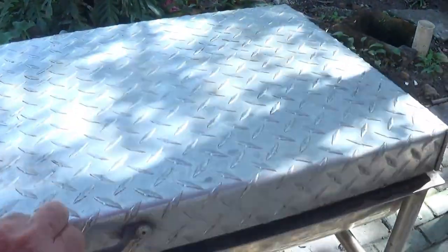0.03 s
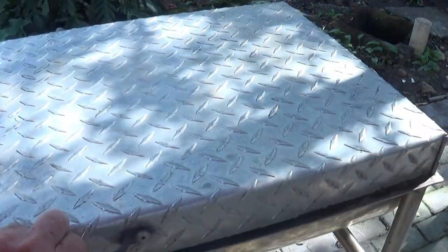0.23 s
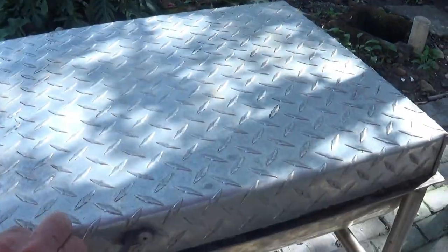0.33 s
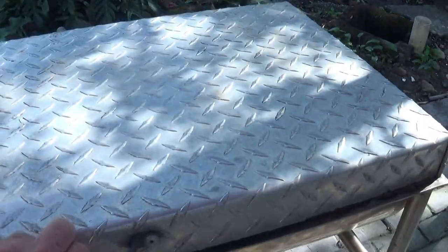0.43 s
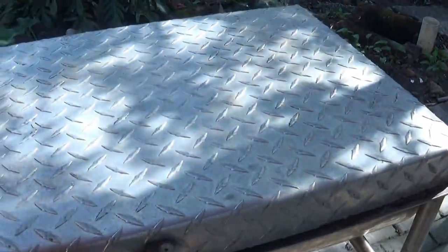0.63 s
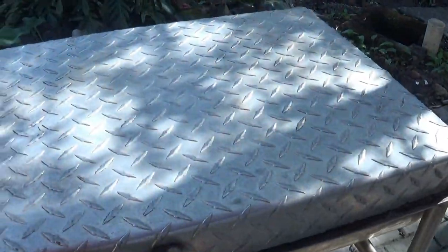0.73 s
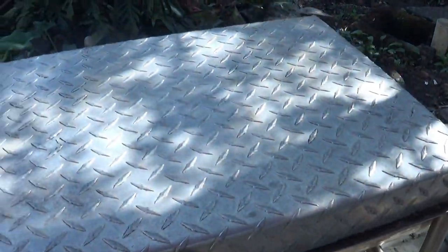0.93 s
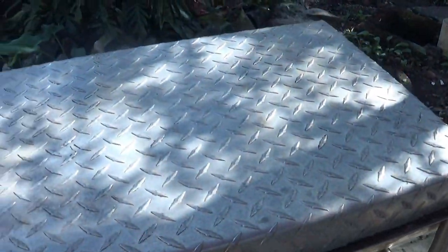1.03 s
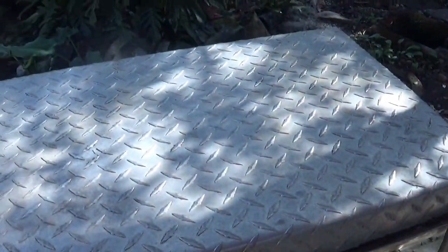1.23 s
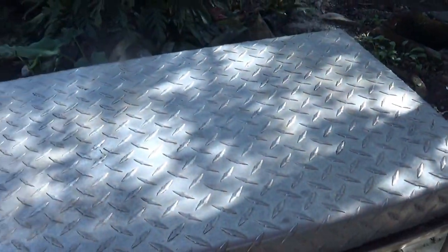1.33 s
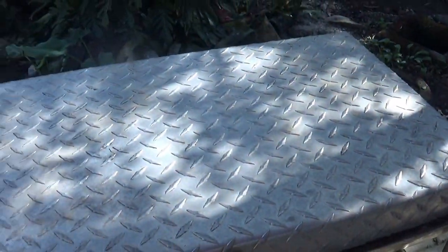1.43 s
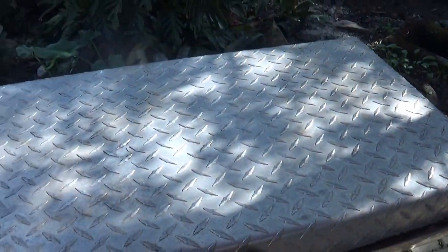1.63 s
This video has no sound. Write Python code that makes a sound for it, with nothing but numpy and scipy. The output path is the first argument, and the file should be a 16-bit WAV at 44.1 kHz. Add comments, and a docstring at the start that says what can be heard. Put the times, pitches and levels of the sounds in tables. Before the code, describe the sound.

A heavy steel lid slams shut on a smoker at about 0.2 seconds, close and loud, chattering against the rim with a hollow boom. Its metallic ring fades by about one second. A thin, sharp tick comes at 0.6 seconds, then a few faint scuffs and a soft knock near 1.7. Quiet garden air and a slight rustle lie beneath, with a very faint bird from 1.2 seconds.

```python
"""Smoker lid slamming shut

A heavy tread-plate lid drops on an outdoor smoker: one edge lands, then the whole rim slams down and
chatters. Each contact clashes steel on steel and feeds the ringing plate; the chamber booms below.
A sharp tick, faint scuffs, a soft knock and a distant bird sit over a thin rustle and quiet garden air.
A limiter ducks the slam."""
import sys
import numpy as np
from scipy import signal
from scipy.fft import irfft
from scipy.io import wavfile
from scipy.ndimage import uniform_filter1d

SR = 44100
rng = np.random.default_rng(int(sys.argv[2]) if len(sys.argv) > 2 else 0)


def unload_wav(signal):
    """Save mono or channel-first audio to the path in sys.argv[1] as 16-bit WAV at rate SR, clipped to [-1, 1]."""
    wavfile.write(
        sys.argv[1],
        SR,
        np.round(np.clip(np.atleast_2d(signal).T, -1, 1) * 32767).astype(np.int16),
    )


N = 74970
TIME = np.arange(N) / SR
FREQS = np.maximum(np.fft.rfftfreq(N, 1 / SR), 1)

# the lid meets the rim: t/s, plate ring level/dB, edge clash level/dB
RIM_CONTACTS = [(0.163, -21.5, -27.5), (0.1854, -19, -5), (0.196, -21, -18.5), (0.214, -22.5, -16.5),
                (0.2205, -40, -20), (0.241, -37, -31.5), (0.257, -41, -22), (0.267, -42, -21.5),
                (0.2685, -28, -37), (0.276, -38.5, -31), (0.296, -59, -40.5)]
# the lid's clear notes: f/Hz, relative level/dB, t60/s before the SUSTAIN stretch
LID_NOTES = [(170, -20, .4), (188, -26, .9), (197, -21, .45), (235, -21, .75), (253, -23, .8),
             (261, -17, .42), (298, -16, .36), (319, -14, .4), (394, -26, .7), (434, -29, 1.0),
             (456, -16, .4), (524, -27, .9), (547, -20, .42), (592, -29, .95), (619, -18, .4),
             (743, -19, .42), (764, -26, 1.0), (823, -16, .4), (836, -12, .46), (875, -25, .8),
             (893, -24, .7), (957, -31, .75), (1081, -21, .36), (1124, -21, .4), (1318, -25, .62),
             (1427, -19.5, .7), (1558, -25, .8), (1735, -27, .9), (1841, -26, 1.0), (1901, -18, .28),
             (1940, -15, .3), (2075, -14, .26), (2142, -14, .3), (2287, -17, .35), (2635, -12, .26),
             (2770, -16, .26), (3021, -23, .43), (3068, -21, .28), (4161, -26, .44), (4417, -20, .22),
             (4651, -21, .26), (5120, -26, .28), (6535, -20, .17), (7315, -19, .17), (7509, -17, .17),
             (9255, -13, .08), (9487, -14, .09)]
# tone of the wash of weaker plate modes: f/Hz, relative density/dB
WASH_SPECTRUM = [(40, -7), (100, -17.5), (170, -12.5), (260, -8.5), (400, -6), (600, -7), (850, -4.5),
                 (1200, -5.5), (1550, -9), (2200, 0.5), (3000, -2.5), (4200, -11.5), (7500, -15),
                 (10500, -22.5), (14500, -59)]
# decay of that wash: f/Hz, t60/s
WASH_DECAY = [(60, 1), (220, 0.66), (800, 0.66), (1500, 0.56), (2300, 0.33), (4500, 0.35), (7500, 0.27),
              (14000, .17)]
# tone of steel on steel at the rim: f/Hz, relative density/dB
CLASH_SPECTRUM = [(60, -30), (250, -9), (1000, -46), (2500, -8), (5000, -12), (7400, -4), (8500, -8),
                  (9400, 3), (10800, -7), (12000, -11), (13200, -25), (14800, -42)]
# stereo image of wash, clash and scuffs: f/Hz, left-right correlation
LID_IMAGE = [(60, 0.46), (160, 1), (300, 0.54), (1000, 0.85), (4500, 0.71), (9000, 0.87), (14000, 0.92)]
# heavy contacts that shake the cooking chamber: t/s, level/dB
BOOM_HITS = [(0.164, -21), (0.221, -20.5)]
# the chamber's resonances: f/Hz, relative level/dB, t60/s
BOOM_MODES = [(188, -9, 0.17), (261.4, 1, 0.13), (292, -14, 0.085)]
# a small hard contact, then its faint echo: t/s, level/dB
TICK_HITS = [(0.6131, -24.5), (0.6195, -36)]
# their bright ring: f/Hz, relative level/dB, t60/s
TICK_RING = [(5300, -23, 0.0072), (5700, -8.5, .005), (6550, 1, 0.0046), (6980, -6.5, 0.01)]
# gritty scuffs: t/s, level/dB, rise/s, t60/s
SCUFF_STROKES = [(0.0415, -44, 0.0018, 0.11), (0.704, -47, 0.003, 0.049), (1.194, -51, 0.0018, 0.039),
                 (1.570, -43, 0.0018, 0.033), (1.608, -54.5, 0.0037, 0.11)]
# tone of the grit: f/Hz, relative density/dB
SCUFF_SPECTRUM = [(300, -47), (1200, -6.5), (3500, -2.5), (6000, -3), (9000, 4), (11000, -2), (14500, -30)]
# body of the soft knock: f/Hz, relative level/dB, t60/s
KNOCK_MODES = [(547, -17, 0.035), (870, 4, 0.011), (1530, 4, 0.0064)]
# the bird's slurred notes: t/s, length/s, start f/Hz, end f/Hz, level/dB
BIRD_SLURS = [(1.205, 0.091, 2870, 2400, -71), (1.429, 0.102, 2950, 2860, -70),
              (1.6, .035, 6600, 5700, -65)]
# swells of the rustle: t/s, level/dB
RUSTLE_FADER = [(0, -62.5), (0.14, -65), (0.4, -69), (0.465, -62), (0.51, -72), (0.585, -52.5),
                (0.62, -56.5), (0.74, -65), (0.86, -64.5), (1.3, -71.5), (1.7, -69.5)]
# tone of the rustle: f/Hz, relative density/dB
RUSTLE_SPECTRUM = [(4000, -24), (7500, -7), (9000, -6), (9900, -1.5), (11000, -5), (12500, -17),
                   (15000, -26)]
# drift of the garden air: t/s, level/dB
AIR_FADER = [(0, -55), (0.15, -58), (0.5, -56), (1.0, -58.5), (1.7, -59)]
# tone of the air: f/Hz, relative density/dB
AIR_SPECTRUM = [(15, -66), (25, -40), (59, -17), (92, -18.5), (236, -3.5), (416, -4), (451, -2), (575, -1),
                (936, -4.5), (1190, -5.5), (2050, -10), (2280, -8), (3820, -14.5), (10400, -16),
                (16000, -24)]
# stereo image of air and rustle: f/Hz, left-right correlation
AIR_IMAGE = [(60, 1), (290, 0.96), (640, 0.78), (1410, 0.46), (3100, 0.47), (6820, 0.85), (15000, 1)]

SUSTAIN = 1.43   # stretches the decay of every lid note
LID_LOW_CUT_HZ, TICK_LOW_CUT_HZ = 173, 2400   # small bodies radiate little bass
TOP_HZ = 16000


def from_db(db):
    """Decibels to gain."""
    return 10 ** (np.asarray(db) / 20)


def flutter(samples):
    """Smoothed random wobble at unit rms."""
    wobble = uniform_filter1d(rng.standard_normal(N), size=samples)
    return wobble / np.sqrt(np.mean(wobble ** 2) + 1e-20)


def at_hz(points, hz):
    """Read a table on a log-frequency axis."""
    table_hz, values = np.transpose(points)
    return np.interp(np.log(hz), np.log(table_hz), values)


def low_cut(x, hz):
    """Second-order high-pass."""
    return signal.sosfilt(signal.butter(2, hz, "high", fs=SR, output="sos"), x)


def stereo_lines(spectrum, image, weight=1):
    """Stereo spectrum of lines with random phases, for a sound of unit rms."""
    mid, side = np.exp(2j * np.pi * rng.random((2, len(FREQS))))
    alike = np.clip(at_hz(image, FREQS), -1, 1)
    lines = np.sqrt(1 + alike) * mid + np.sqrt(1 - alike) * side * [[1], [-1]]
    lines *= from_db(at_hz(spectrum, FREQS)) * weight
    return lines / irfft(lines, N).std()


def clicks(hits):
    """One impulse per row of t/s, level/dB."""
    out = np.zeros(N)
    for s, db in hits:
        out[int(s * SR)] += from_db(db)
    return out


def ring_out(blows, t60, spread_s=0.0019):
    """Envelope of a struck body: each blow adds energy, which spreads and dies away."""
    keep, fill = from_db(-120 / (t60 * SR)), np.exp(-1 / (spread_s * SR))
    energy = signal.lfilter([1 - fill], np.convolve([1, -keep], [1, -fill]), blows ** 2 + 1e-22)
    return np.sqrt(energy)


def struck(hits, modes):
    """Clicks set damped sines ringing."""
    out, drive = 0, clicks(hits) + 1e-18
    for hz, db, t60 in modes:
        r, w = from_db(-60 / (t60 * SR)), 2 * np.pi * hz / SR
        out = out + from_db(db) * signal.lfilter([0, np.sin(w)], [1, -2 * r * np.cos(w), r * r], drive)
    return out


def lid(seat_s=0.296, settle_s=0.053, seat_loss_db=3.5):
    """The slam: contacts clash and feed the plate; as the lid seats, the rim soaks up some ring."""
    blows = clicks([(s, db) for s, db, _ in RIM_CONTACTS])
    seating = from_db(-seat_loss_db * np.clip((TIME - seat_s) / settle_s, 0, 1))
    return rim_clash() + (lid_notes(blows) + plate_wash(blows)) * seating + chamber_boom()


def lid_notes(blows, trim_db=-1, tilt_db_per_octave=0.08, kick_rad=0.37, width_rad=0.36):
    """The strongest modes sing out, blurred while each contact kicks their phase."""
    out, contacts = np.zeros((2, N)), np.flatnonzero(blows)
    kicks = rng.standard_normal((len(LID_NOTES), 32))[:, :len(contacts)]
    ramps = np.clip((TIME - TIME[contacts, None]) / .003, 0, 1)   # a kick takes 3 ms
    offsets = rng.uniform(-0.94, 1, (len(LID_NOTES), 2))
    for (hz, db, t60), kick, (start, apart) in zip(LID_NOTES, kicks, offsets):
        phase = 2 * np.pi * hz * TIME + np.pi * start + kick_rad * (kick @ ramps)
        stereo_phase = phase + width_rad * apart * np.array([[1], [-1]])
        gain = from_db(db + trim_db + tilt_db_per_octave * np.log2(hz / 1000))
        out += np.sqrt(2) * gain * ring_out(blows, t60 * SUSTAIN) * np.sin(stereo_phase)
    return out


def plate_wash(blows, trim_db=-1, spacing_hz=11):
    """A crowd of unevenly spaced plate modes dies away in half-octave bands, the highest first."""
    mode_hz = (np.arange(2000) + rng.random(2000)) * spacing_hz
    is_mode = np.zeros(len(FREQS))
    is_mode[np.searchsorted(FREQS, mode_hz[mode_hz < TOP_HZ])] = 1
    lines = stereo_lines(WASH_SPECTRUM, LID_IMAGE, is_mode)
    out, edges_hz = 0, 32 * 2 ** np.arange(0, 9.1, .5)
    for low, high in zip(edges_hz, edges_hz[1:]):
        band = irfft(lines * ((FREQS >= low) & (FREQS < high)), N)
        out = out + band * ring_out(blows, at_hz(WASH_DECAY, np.sqrt(low * high)))
    return from_db(trim_db) * out


def rim_clash(t60=0.034):
    """Steel hits steel: a short, bright splash of noise on every contact."""
    blows = clicks([(s, db) for s, _, db in RIM_CONTACTS])
    return irfft(stereo_lines(CLASH_SPECTRUM, LID_IMAGE), N) * ring_out(blows, t60)


def chamber_boom():
    """The hollow cooking chamber booms under the heavy contacts."""
    return low_cut(struck(BOOM_HITS, BOOM_MODES), hz=150)


def ticks():
    """A tiny hard contact and its faint echo run together into one sharp, thin tick."""
    return low_cut(low_cut(struck(TICK_HITS, TICK_RING), TICK_LOW_CUT_HZ), TICK_LOW_CUT_HZ)


def scuffs(grain_db=4):
    """Short swells of bright noise, roughened by a fast flicker in level."""
    envelope = 0
    for s, db, rise, t60 in SCUFF_STROKES:
        age = np.maximum(TIME - s, 0)
        envelope = envelope + from_db(db - 60 * age / t60) * (1 - np.exp(-age / rise))
    grain = from_db(grain_db * flutter(samples=40))
    return envelope * grain * irfft(stereo_lines(SCUFF_SPECTRUM, LID_IMAGE), N)


def knock(at_s=1.6655, hit_db=-51):
    """One soft tap on a well-damped body."""
    return struck([(at_s, hit_db)], KNOCK_MODES)


def rustle():
    """A thin, high hiss swells and sinks, perhaps leaves."""
    level = from_db(np.interp(TIME, *np.transpose(RUSTLE_FADER)))
    return level * irfft(stereo_lines(RUSTLE_SPECTRUM, AIR_IMAGE), N)


def bird(waver_hz=91.3):
    """Faint, wavering whistles fall in pitch as they swell and fade."""
    out, waver = np.zeros(N), waver_hz * flutter(samples=300)
    for s, length, start_hz, end_hz, db in BIRD_SLURS:
        progress = np.clip((TIME - s) / length, 0, 1)
        pitch_hz = start_hz + (end_hz - start_hz) * progress + waver
        out += from_db(db) * np.sin(np.pi * progress) * np.sin(2 * np.pi * np.cumsum(pitch_hz) / SR)
    return out


def garden_air():
    """The bed: a murmur of wind and distance, with a thin hiss on top."""
    level = from_db(np.interp(TIME, *np.transpose(AIR_FADER)))
    return level * irfft(stereo_lines(AIR_SPECTRUM, AIR_IMAGE), N)


def scene():
    """The mix: lid up front, small sounds around it, air behind."""
    return low_cut(lid() + knock(), LID_LOW_CUT_HZ) + ticks() + scuffs() + rustle() + bird() + garden_air()


def record(dry):
    """A look-ahead limiter ducks the slam and recovers quickly; a steep low-pass trims the top."""
    threshold_db, attack_s, release_db_per_s = -10, 0.0079, 436
    over_db = np.maximum(20 * np.log10(np.abs(dry).max(axis=0) + 1e-9) - threshold_db, 0)
    release_db = release_db_per_s * TIME
    held_db = np.maximum.accumulate(over_db + release_db) - release_db
    smooth_db = uniform_filter1d(held_db, size=int(attack_s * SR))
    duck_db = np.interp(TIME + attack_s / 2, TIME, smooth_db)   # starts ahead of the peak
    high_cut = signal.cheby2(16, 70, TOP_HZ + 600, fs=SR, output="sos")
    return signal.sosfilt(high_cut, dry * from_db(-duck_db))


dry = scene()
out = record(dry)
unload_wav(out)
```